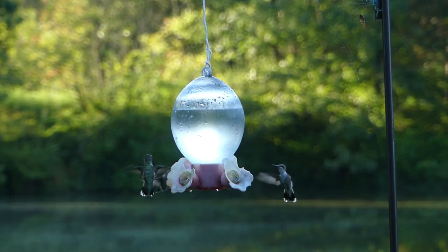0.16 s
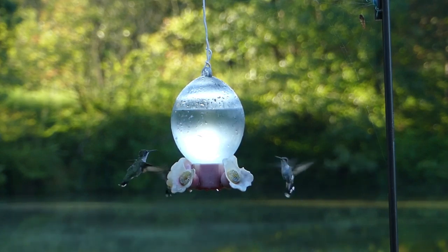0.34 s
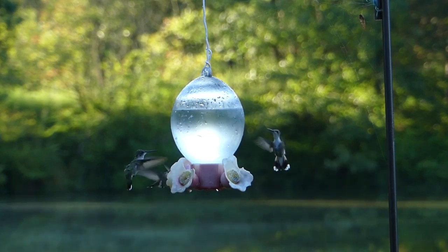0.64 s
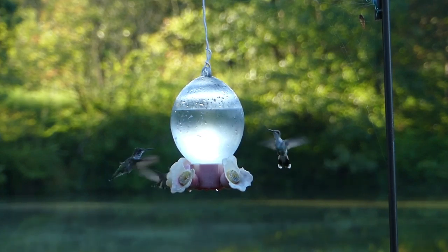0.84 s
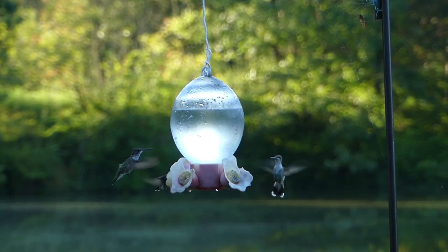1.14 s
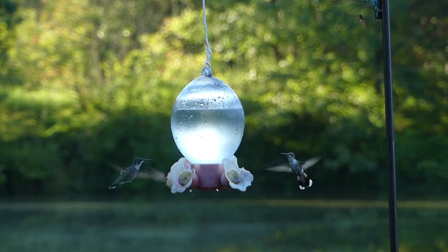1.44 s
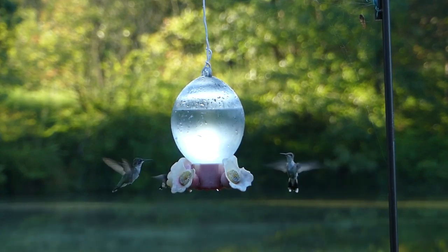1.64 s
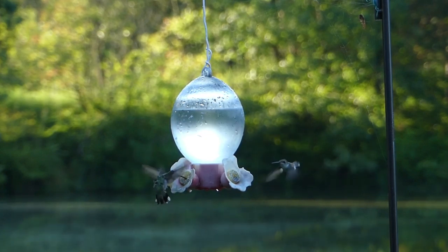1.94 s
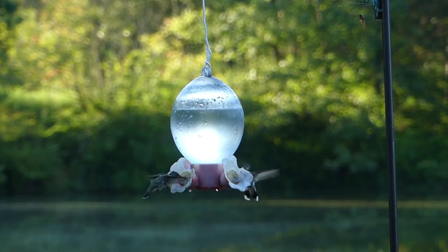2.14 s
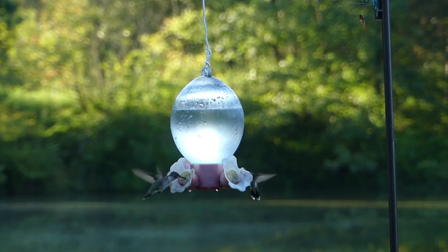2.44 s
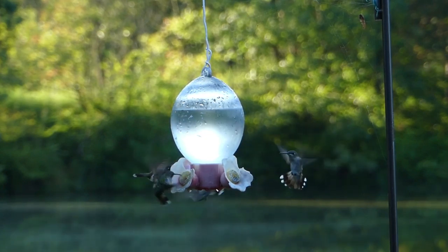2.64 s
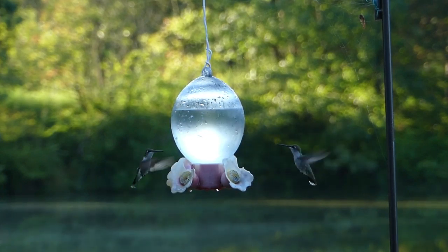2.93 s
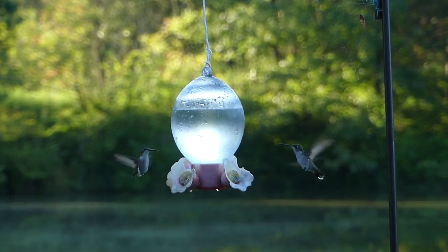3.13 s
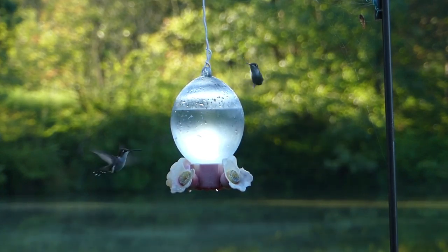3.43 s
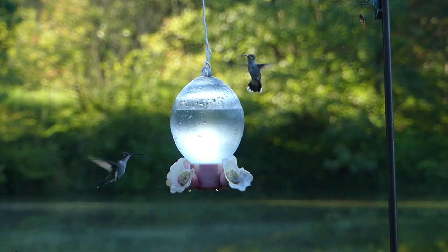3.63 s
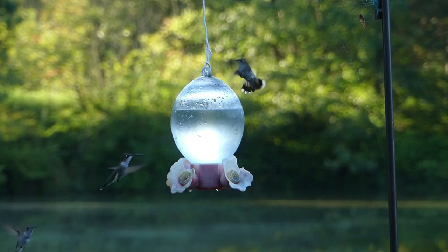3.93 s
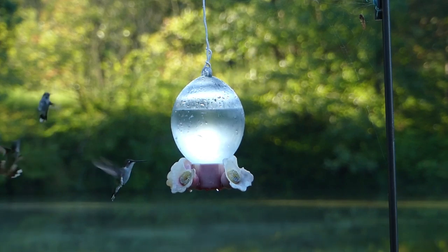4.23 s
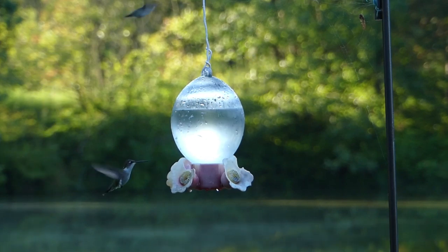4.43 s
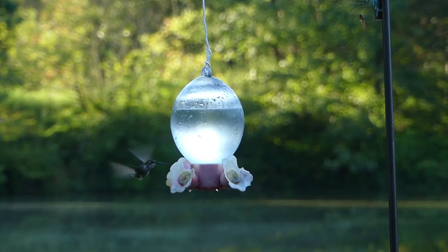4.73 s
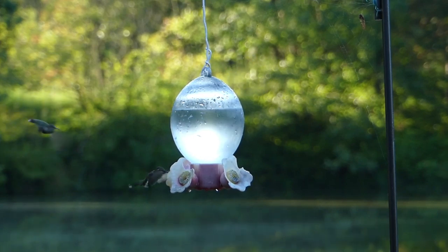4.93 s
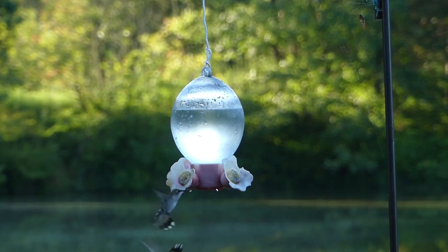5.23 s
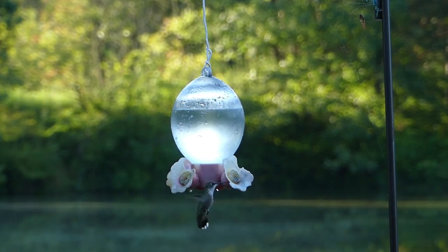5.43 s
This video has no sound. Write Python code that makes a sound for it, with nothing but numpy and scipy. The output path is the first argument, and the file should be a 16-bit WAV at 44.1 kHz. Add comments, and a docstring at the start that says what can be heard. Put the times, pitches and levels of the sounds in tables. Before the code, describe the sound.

Outdoors by a feeder, several hummingbirds hover fairly close, their wings humming in short swells with light flicks. Sparse high chirps build into bursts of squeaky, stuttering chatter as they chase each other, with one thin squeal late on. Behind them lie a steady, quiet insect drone, a low motor hum and soft airy hiss.

```python
"""Garden feeder: hummingbirds squabble a few metres away.
Chips, stutters, notes and trills are quick pitch sweeps of the voice, clean or rasping; one thin squeal.
Wing strokes pulse and stir the air into a whirr; feathers swish and snap in sharp turns.
Insects drone in the trees, an electric motor hums, open air hisses; a faint hiss rings near 2-3 kHz.
Close surfaces add a short echo."""
import sys
import numpy as np
from scipy import signal
from scipy.fft import rfft, irfft, next_fast_len
from scipy.io import wavfile
from scipy.ndimage import uniform_filter1d, map_coordinates

SR = 44100
rng = np.random.default_rng(int(sys.argv[2]) if len(sys.argv) > 2 else 0)


def store_pcm(level_fs):
    """Save levels as 16-bit WAV."""
    pcm = np.round(np.clip(level_fs, -1, 1) * 32767).astype(np.int16)
    wavfile.write(sys.argv[1], SR, np.atleast_2d(pcm).T)


N = 245637
TIME = np.arange(N) / SR
CHIP_LOW_HZ = 2133.6  # end of every dive

# pitch dives: t/s, length/s, top f/Hz, level/dB, 2nd harmonic/dB, rasp/0-1
CHIPS = [ (.230, .013, 8660, -14, -8.5, 0.38), (1.017, .017, 7580, -13, -9.5, 0.25),
         (1.771, 0.0079, 3020, -19.5, -16, 0.6), (1.793, 0.02, 3010, -24, -24, 0.56),
         (1.93, .013, 2690, -25, -22, 0.68), (1.971, 0.017, 3215, -17, -13, 0.38),
         (2.559, 0.033, 4040, -12.5, -9.5, 0.25), (2.648, 0.012, 3080, -18, -9, 0.84),
         (2.695, 0.028, 2820, -21.5, -4.5, 0.78), (2.752, 0.046, 3800, -16, -4, 0.42),
         (2.845, 0.029, 3040, -19.5, -8.5, 0.46), (2.934, .014, 2480, -21.5, -13, .5),
         (3.059, 0.044, 2975, -15.5, -10, 0.36), (3.836, .028, 4680, -18.5, -9, 0.43),
         (4.008, 0.021, 2975, -14.5, -16, 0.13), (4.465, 0.026, 6050, -14, -11, 0.21),
         (4.539, 0.022, 3450, -12, -17, 0.3), (4.73, .037, 2570, -15.5, -15, 0.03),
         (4.891, 0.0049, 4320, -22, -4, 0.8), (5.042, 0.0085, 4800, -17, -5, 0.5),
         (5.086, 0.031, 4010, -13, -11, 0.12), (5.215, 0.0079, 4840, -18, -5, 0.37),
         (5.385, 0.02, 4910, -15, -6.5, .25), (5.467, 0.039, 2755, -15.5, -12, 0.24)]
# broken chips: t/s, spacing/s, top f/Hz, level/dB, lead-in/dB, 2nd harmonic/dB, rasp/0-1
STUTTERS = [(3.9172, 0.0074, 7040, -13, -8, -6.5, .5), (4.625, 0.009, 5620, -16, -1, -5.5, .45),
            (4.927, 0.0086, 4760, -15.5, -9, -4.5, 0.1), (5.2539, .0074, 6300, -14, -16, -5.5, 0.17),
            (5.318, 0.0057, 3700, -11, -11, -14.5, 0.24)]
# stutter strokes: share of the full dive in octaves/0-1
STROKE_HEIGHTS = [0.422, 1, 0.566, 0.407]
# held notes: t/s, length/s, first f/Hz, last f/Hz, level/dB, 2nd harmonic/dB, rasp/0-1
NOTES = [ (2.388, 0.029, 9750, 9300, -33, -30, 0.75), (2.628, 0.027, 4580, 4600, -27.5, -0.5, 0.3),
         (2.703, 0.0082, 5050, 4730, -25, -5.5, 0), (2.751, 0.01, 6900, 4000, -27, -7, 0.6),
         (2.966, 0.079, 2507, 2475, -33, -9.5, 0.76), (3.055, 0.01024, 6080, 3100, -24, -28, 1),
         (3.387, 0.063, 2945, 2400, -32, -3.5, 0.73), (3.768, 0.035, 2860, 2550, -34.5, -1, 0.9),
         (3.99, 0.032, 2915, 2730, -30, -1.5, 0.68), (4.023, 0.02, 2480, 2340, -30.5, -8, 0.22),
         (4.668, 0.054, 6430, 6620, -27, -30, 0.1), (4.698, .027, 7800, 7440, -26, -30, 0.8),
         (4.719, 0.026, 2690, 2560, -26, -2.5, .55), (4.856, .036, 6970, 5200, -20.5, -28, 0.52),
         (4.993, .038, 3370, 6880, -25.5, -9.5, 0.94), (5.196, 0.023, 6250, 4040, -24, -9, 0.7),
         (5.368, 0.0265, 8460, 8040, -28.5, -30, 0.78), (5.408, 0.018, 2340, 2180, -30, -4, 0)]
# buzzy trills: t/s, length/s, first f/Hz, last f/Hz, warble depth/Hz, level/dB, accent/dB
TRILLS = [(2.397, 0.091, 5620, 6600, 420, -28, 6), (3.697, 0.084, 8240, 7980, 910, -29.5, -15),
          (3.982, 0.024, 7100, 7670, 645, -30.5, 7.5), (4.412, 0.075, 7480, 7730, 990, -25.5, 5.5),
          (4.726, 0.108, 6500, 6480, 249, -32.5, 14), (5.015, 0.051, 7330, 7670, 700, -32.5, 7)]
# squeal contour: t/s, top f/Hz, swoop depth/Hz, level/dB
SQUEAL = [(4.668, 13600, -12, -42), (4.682, 12600, 0, -33), (4.708, 13200, 2, -35),
          (4.720, 13900, 303, -40), (4.728, 13800, 5000, -31.5), (4.770, 13500, 7502, -35.5),
          (4.810, 13100, 10002, -37), (4.860, 12500, 9993, -62)]
# feather swishes: t/s, Gaussian sigma/s, level/dB
SWISHES = [(.13, 0.032, -44), (2.645, 0.037, -45.5), (3.275, 0.027, -44.5), (3.63, 0.045, -51.5),
           (4.783, 0.026, -35.5), (4.903, 0.046, -37), (5.145, 0.038, -40)]
# swish spectrum: f/Hz, gain/dB
SWISH_SPECTRUM = [(1200, -81), (3000, 22), (7000, 31), (11000, 25), (13500, 17), (15500, 3)]
# wing flicks and snaps: t/s, level/dB, centre f/Hz, decay/s
SNAPS = [(0.564, -42.5, 2470, 0.023), (1.575, -38, 2550, 0.011), (1.774, -34.5, 1500, 0.013),
         (1.935, -36.5, 1530, 0.015), (1.979, -54, 1550, 0.0063), (2.111, -38.5, 3130, 0.023),
         (2.174, -39.5, 2960, .015), (5.1226, -18.5, 12000, .0005), (5.125, -6, 8700, 0.00014)]
# wingbeat rates: f/Hz
WINGBEATS_HZ = [44.72, 50.54, 58.23]
# whirr spectrum: f/Hz, gain/dB
WHIRR_SPECTRUM = [(130, -27), (310, -22), (355, -10.5), (385, -6), (407, 2.5), (435, -10.5), (480, -14),
                  (530, -41), (690, -13.5), (750, -29.5), (1400, -26), (1900, -30.5), (2400, -16.5),
                  (4500, -46)]
# hover contour, loudest as the birds crowd the feeder: t/s, level/dB
HOVER = [(0, -45), (.95, -48.5), (1.7, -43.5), (2.2, -41), (3.15, -42.5), (3.55, -47.5), (4.25, -47.5),
         (4.7, -53), (5.57, -51)]
# darts, wings briefly beating harder: t/s, level/dB
DARTS = [(.06, -38), (.565, -36), (1.18, -43), (1.38, -38), (1.62, -35.5), (1.986, -35), (2.737, -35.5),
         (2.864, -37), (3.351, -36), (3.72, -38), (3.855, -40), (4.27, -38.5), (4.42, -40.5), (4.61, -42),
         (4.924, -41)]
# near insect's buzzes: t/s, length/s, f/Hz, level/dB
BUZZES = [(.62, .13, 8600, -56), (0.825, 0.1, 8270, -51), (1.25, 0.099, 8330, -52),
          (1.516, 0.27, 8700, -56), (2.096, 0.071, 8240, -51), (4.098, 0.15, 8350, -51)]
# insect chorus: f/Hz, density/(dB re 1/Hz)
CHORUS = [(4700, -105), (5400, -84), (5900, -81), (6250, -79), (6550, -75), (7000, -71.5), (7500, -82),
          (7750, -80.5), (8100, -90), (9000, -105)]
# faint steady ringing hiss near 2-3 kHz: f/Hz, density/(dB re 1/Hz)
LOW_RING = [(1800, -105), (2020, -86), (2150, -71), (2290, -92.5), (2460, -75.5), (2680, -97),
            (2850, -80.5), (3050, -94), (3250, -85.5), (3900, -84.5), (4700, -133), (5500, -110)]
# motor lines: f/Hz, level/dB, left minus right/dB, left minus right phase/rad
HUM = [(119.8, -43.5, -0.5, 0.44), (239.6, -51.5, -2, 1), (297.5, -63.5, 10, 0.43), (1525, -72.5, 1, 0.51)]
# open air: f/Hz, density/(dB re 1/Hz)
AIR = [(25, -76), (60, -90.5), (100, -76.5), (190, -73), (300, -79.5), (460, -77.5), (560, -84.5),
       (690, -84.5), (930, -89), (1500, -88), (1850, -92.5), (4700, -92.5), (9500, -95), (12500, -102),
       (15000, -103)]
# stereo width of the background: f/Hz, side minus mid/dB
WIDTH = [(60, -19), (110, -16), (200, 1), (380, 0), (700, 2.5), (1290, 1.5), (2380, -1), (4400, -4),
         (8120, -12), (15000, 0.5)]
# close reflections: delay/s, gain/dB, extra delay right/s
ECHOES = [(.0017, -50, .00016), (.0041, -8.5, -.00012), (.0094, -8, .00007)]
# microphone mismatch: f/Hz, left minus right/dB
MIC_BALANCE = [(300, .5), (1400, -.5), (2500, -2.5), (4400, 0.5), (15000, 0)]
# shared microphone response: f/Hz, gain/dB
MIC_RESPONSE = [(4000, 1.5), (4450, 4), (4670, -2), (4850, 5), (5200, -1)]


def chatter():
    """All tabled calls; throat and bill pass little above 10 kHz."""
    out = np.zeros(N)
    for voice, table in [(chip, CHIPS), (stutter, STUTTERS), (note, NOTES), (trill, TRILLS)]:
        for start_s, *shape in table:
            add(out, start_s, voice(*shape))
    return colour(out, [(1000, -1), (1700, -16.5), (2200, -4.5), (9000, -2), (10300, -9), (12000, -26)])


def syrinx(pitch_hz, second_db, rasp, jitter_hz=400, grain_hz=1400, third_step_db=-11, shimmer_db=2.6):
    """Three-partial voice; rasp shakes the pitch, frays the partials (upper ones most) and adds hiss."""
    n = len(pitch_hz)
    hz = pitch_hz + rasp * jitter_hz * walk(700, n)
    phase = 2 * np.pi * np.cumsum(hz) / SR
    hiss = unit(band(rng.standard_normal(SR // 4), hz=4500, width_hz=4000))[:n]
    out = rasp * amp(-12) * hiss
    for k, partial_db in enumerate([0, second_db, second_db + third_step_db], 1):
        fray = np.clip(rasp + 0.39 * np.log2(k), 0, 1)
        shake = (walk(grain_hz, n) + 1j * walk(grain_hz, n)) / np.sqrt(2)
        partial = (np.sqrt(1 - fray ** 2) + fray * shake) * np.exp(1j * k * phase)
        out += amp(partial_db) * (k * hz < SR / 2) * partial.imag
    return out * amp(shimmer_db * walk(330, n))


def chip(length_s, top_hz, db, second_db, rasp, fade_db_per_s=313, db_per_oct=-4.5, rasp_per_oct=0.27):
    """Pitch dive: fast and rough at first, settling and clearing at the bottom of the voice."""
    t = TIME[:int(length_s * SR)]
    drop_oct = np.log2(top_hz / CHIP_LOW_HZ)
    bend = 1.6 * drop_oct  # higher starts drop more steeply
    height_oct = drop_oct * (1 - np.expm1(-bend * t / length_s) / np.expm1(-bend))
    edge_s = 0.34 * length_s
    envelope = fade(t, attack_s=min(0.0093, edge_s), release_s=edge_s)
    gain = amp(db + db_per_oct * height_oct - fade_db_per_s * t) * envelope
    return gain * syrinx(CHIP_LOW_HZ * 2 ** height_oct, second_db, rasp + rasp_per_oct * height_oct)


def stutter(spacing_s, top_hz, db, lead_db, second_db, rasp, step_db=-5.5):
    """Four overlapping chips: soft lead-in, hard high stroke, two ever lower and weaker."""
    out = np.zeros(N)
    for k, height in enumerate(STROKE_HEIGHTS):
        stroke_db = db + (step_db * (k - 1) if k else lead_db)
        stroke_hz = CHIP_LOW_HZ * (top_hz / CHIP_LOW_HZ) ** height
        add(out, k * spacing_s, chip(1.2 * spacing_s, stroke_hz, stroke_db, second_db, rasp))
    return out


def note(length_s, first_hz, last_hz, db, second_db, rasp, droop_db=1):
    """Held note: linear glide, slight droop in level."""
    t = TIME[:int(length_s * SR)]
    gain = amp(db + droop_db * (.5 - t / length_s)) * fade(t, attack_s=0.0037, release_s=0.0038)
    return gain * syrinx(np.linspace(first_hz, last_hz, len(t)), second_db, rasp)


def trill(length_s, first_hz, last_hz, depth_hz, db, accent_db, warble_hz=108, accent_s=0.0036):
    """Squeak with a quick, uneven warble and an opening accent."""
    t = TIME[:int(length_s * SR)]
    warble = np.sin(2 * np.pi * warble_hz * t + 0.92 * walk(98.2, len(t)))
    jitter_hz = 280 * walk(2100, len(t))
    hz = np.linspace(first_hz, last_hz, len(t)) - depth_hz * warble + jitter_hz
    swell = np.sqrt(np.sin(np.pi * t / length_s))
    accent = amp(accent_db) * t / accent_s * np.exp(1 - t / accent_s)
    shimmer_db = 3 * walk(593, len(t))
    return np.sin(2 * np.pi * np.cumsum(hz) / SR) * (swell + accent) * amp(db + shimmer_db)


def squeal(swoop_hz=79, dip_at_s=4.7272, jitter_hz=220, second_ratio=0.95, second_db=-5):
    """Very high whistle, dipping ever deeper as it fades; a second voice swoops out of step."""
    top_hz, depth_hz, db = curve(SQUEAL)
    swooping = np.sqrt(np.abs(depth_hz) / np.max(depth_hz))
    out = np.zeros(N)
    for ratio, gain in [(1, 1), (second_ratio, amp(second_db) * swooping)]:
        cycles = ratio * swoop_hz * (TIME - dip_at_s) + 0.064 * walk(50)
        dip = (1 - np.abs(np.sin(np.pi * cycles))) ** 1.3
        hz = top_hz - depth_hz * dip + jitter_hz * swooping * walk(1500)
        out += gain * np.sin(2 * np.pi * np.cumsum(hz) / SR)
    return out * amp(db) * (TIME > SQUEAL[0][0]) * (TIME < SQUEAL[-1][0])


def feathers():
    """Air swishing through feathers; wing flicks and snaps as band-passed noise bursts."""
    swell = sum(amp(db) * np.exp(-((TIME - at_s) / sigma_s) ** 2 / 2) for at_s, sigma_s, db in SWISHES)
    out = swell * unit(colour(rng.standard_normal(N), SWISH_SPECTRUM))
    t = TIME[:SR // 8]
    for start_s, db, hz, decay_s in SNAPS:
        width_hz = min(1.7 * hz, SR / 4)
        noise = rng.standard_normal(len(t))
        burst = unit(band(band(noise, hz, width_hz), hz, width_hz))
        envelope = np.exp(-t / decay_s) * (1 - np.exp(-4 * t / decay_s))
        add(out, start_s, amp(db) * burst * envelope)
    return out


def wings(wander=.05, turbulence=0.062, pulse_cutoff_hz=600, gain_db=-1, side_db=-12):
    """Each stroke pushes a soft air pulse and stirs turbulence; beat rates wander."""
    strokes = np.zeros(N)
    soften = signal.butter(2, pulse_cutoff_hz, fs=SR, output="sos")
    for beat_hz in WINGBEATS_HZ:
        cycles = np.cumsum(beat_hz * (1 + wander * walk(7))) / SR
        pulses = np.diff(np.floor(cycles), prepend=0)
        stirring = (.5 + np.cos(np.pi * cycles) ** 2) / 2
        strokes += signal.sosfilt(soften, pulses) + turbulence * stirring * rng.standard_normal(N)
    mid = colour(strokes, WHIRR_SPECTRUM)
    mid /= np.sqrt(uniform_filter1d(mid ** 2, size=1500))  # levelled; effort sets the swells
    side = amp(side_db) * unit(colour(rng.standard_normal(N), WHIRR_SPECTRUM))
    return spread(mid, side) * wing_effort() * amp(gain_db)


def wing_effort(flutter_db=2.5, flutter_hz=23.78, rise_s=0.013, fall_s=0.023):
    """Whirr gain: restless hovering plus a quick surge per dart."""
    hover = amp(curve(HOVER)[0] + flutter_db * walk(flutter_hz))
    darts = sum(amp(db) * np.exp(-np.maximum((at_s - TIME) / rise_s, (TIME - at_s) / fall_s))
                for at_s, db in DARTS)
    return np.hypot(hover, darts)


def insects(scrape_hz=340):
    """One near insect buzzing in bouts of narrow-band noise, over a distant chorus."""
    near = np.zeros(N)
    for start_s, length_s, hz, db in BUZZES:
        t = TIME[:int(length_s * SR)]
        scrape = walk(scrape_hz, len(t)) + 1j * walk(scrape_hz, len(t))
        buzz = np.real(scrape * np.exp(2j * np.pi * hz * t))
        add(near, start_s, amp(db) * np.sqrt(np.sin(np.pi * t / length_s)) * buzz)
    return near + wash(CHORUS, flicker_db=0.3, flicker_hz=45.1)


def ringing_hiss():
    """Faint steady ringing hiss near 2-3 kHz."""
    return wash(LOW_RING, flicker_db=0.85, flicker_hz=6.02)


def motor(waver_db=0.33, waver_hz=6.13):
    """Steady electric hum, slightly out of phase between the sides."""
    sides = np.array([[.5], [-.5]])
    hum = np.zeros((2, N))
    for hz, db, pan_db, lead_rad in HUM:
        phase = 2 * np.pi * (hz * TIME + rng.random()) + sides * lead_rad
        hum += np.sqrt(2) * amp(db + sides * pan_db) * np.sin(phase)
    return hum * amp(-waver_db * walk(waver_hz))


def wash(spectrum, flicker_db, flicker_hz, scatter_s=.012):
    """Wide, flickering noise bed; scatter off small surfaces ripples the treble."""
    t = TIME[:SR // 10]
    scatter = rng.standard_normal(len(t)) * np.exp(-t / scatter_s)
    scatter = signal.sosfilt(signal.butter(2, 420, "high", fs=SR, output="sos"), scatter)
    path = scatter / np.linalg.norm(scatter)
    path[0] += 1  # direct sound
    path /= np.linalg.norm(path)
    noise = signal.fftconvolve(rng.standard_normal((2, N)), path[None], axes=1)[:, :N]
    mid, side = colour(noise, spectrum) * np.sqrt(SR / 2)
    return spread(mid, colour(side, WIDTH)) * amp(flicker_db * walk(flicker_hz))


def reflections(x, early_db=-10, early_s=0.029, side_db=-6, late_db=-22, t60_s=0.63):
    """Echoes and scatter off close surfaces; a faint far tail, different on each side."""
    t = TIME[:SR // 2]
    (mid, side), late = rng.standard_normal((2, 2, len(t)))
    early = spread(mid, amp(side_db) * side) * np.exp(-t / early_s) * np.sqrt(2 / (early_s * SR))
    late *= amp(-60 * t / t60_s) * np.sqrt(2 * np.log(1000) / (t60_s * SR))  # unit energy
    response = amp(early_db) * early + amp(late_db) * late
    for delay_s, db, lag_s in ECHOES:
        response[0, int(delay_s * SR)] += amp(db)
        response[1, int((delay_s + lag_s) * SR)] += amp(db)
    return signal.fftconvolve(x[None], response, axes=1)[:, :N]


def amp(db):
    return 10 ** (np.asarray(db) / 20)


def unit(x):
    return x / np.sqrt(np.mean(x ** 2))


def curve(rows):
    """Table columns, interpolated linearly over TIME."""
    times_s, *columns = np.transpose(rows)
    return [np.interp(TIME, times_s, column) for column in columns]


def fade(t, attack_s, release_s):
    """Sine-squared attack and release round a hold."""
    ramp = np.minimum(t / attack_s, (t[-1] - t) / release_s)
    return np.sin(np.pi / 2 * np.clip(ramp, 0, 1)) ** 2


def walk(rate_hz, count=N):
    """Smooth random signal, spread near 1."""
    steps = rng.standard_normal(N // 4)[:int(count * rate_hz / SR) + 4]
    return map_coordinates(steps, [np.arange(count) * rate_hz / SR], order=2, mode="nearest")


def colour(x, points):
    """Filter through (f/Hz, gain/dB) points."""
    hz, db = np.transpose(points)
    size = next_fast_len(N)
    bins_hz = np.arange(size // 2 + 1) * SR / size
    gain = amp(np.interp(np.log(bins_hz + 1), np.log(hz), db))
    return irfft(rfft(x, size) * gain, size)[..., :N]


def band(x, hz, width_hz):
    """Resonance, unity gain at centre."""
    return signal.lfilter(*signal.iirpeak(min(hz, SR / 2 - 1), hz / width_hz, fs=SR), x)


def add(track, start_s, sound):
    i = max(int(start_s * SR), 0)
    track[i:i + len(sound)] += sound[:N - i]


def spread(mid, side):
    return np.array([mid + side, mid - side])


def scene():
    """Birds and their echo over whirr, insects, ringing hiss, motor and open air; stereo."""
    birds = chatter() + squeal() + feathers()
    garden = birds + reflections(birds) + wings() + insects() + ringing_hiss() + motor()
    return garden + wash(AIR, flicker_db=1.0, flicker_hz=4.86)


def record(dry, low_cut_hz=60, high_cut_hz=15200):
    """Two slightly unequal microphones with a shared narrow dip; deep bass thinned, top cut."""
    pair = [colour(x, [(hz, side * db) for hz, db in MIC_BALANCE]) for x, side in zip(dry, (.5, -.5))]
    coloured = colour(np.array(pair), MIC_RESPONSE)
    thinned = signal.sosfilt(signal.butter(2, low_cut_hz, "high", fs=SR, output="sos"), coloured)
    return signal.sosfilt(signal.ellip(8, .2, 70, high_cut_hz, fs=SR, output="sos"), thinned)


dry = scene()
out = record(dry)
store_pcm(out)
```